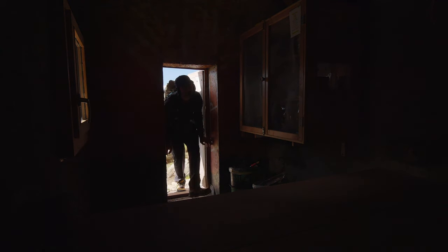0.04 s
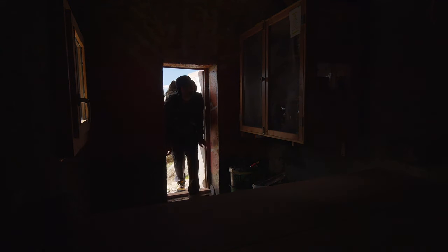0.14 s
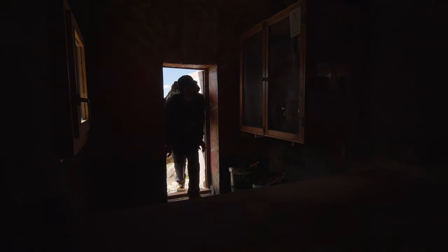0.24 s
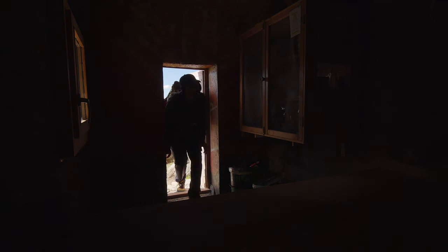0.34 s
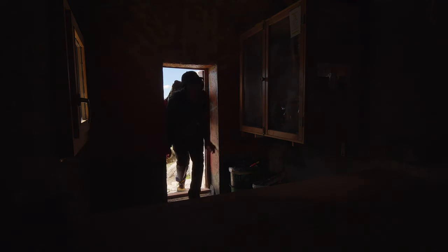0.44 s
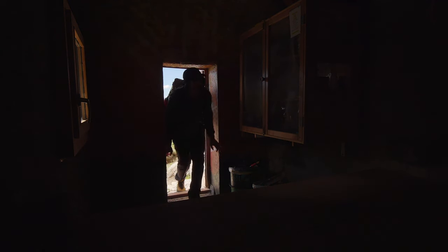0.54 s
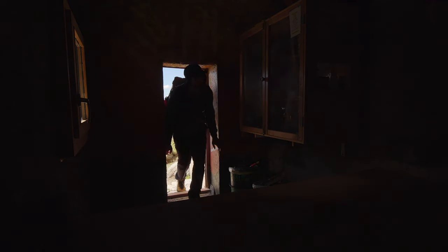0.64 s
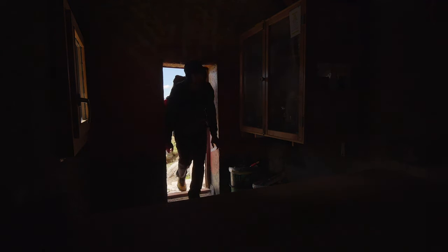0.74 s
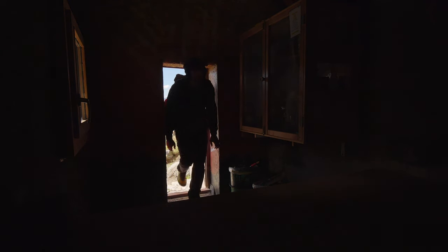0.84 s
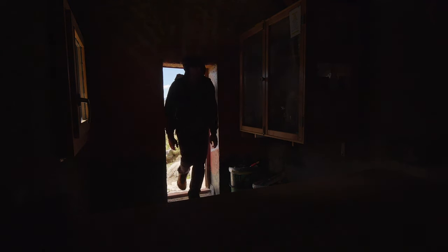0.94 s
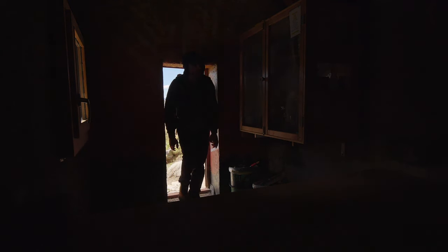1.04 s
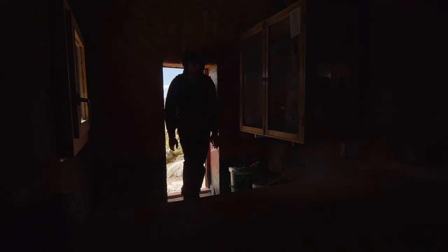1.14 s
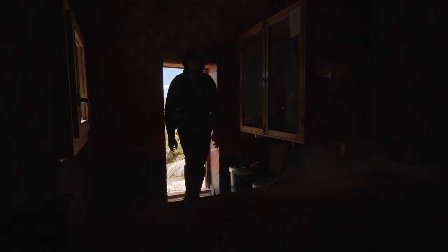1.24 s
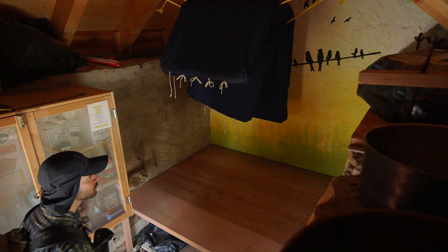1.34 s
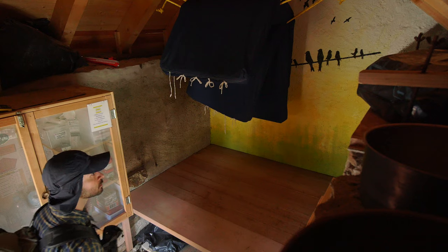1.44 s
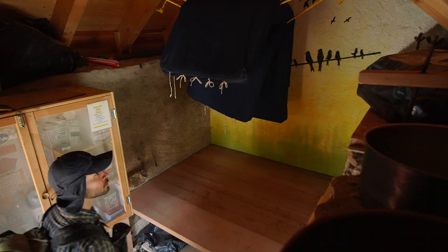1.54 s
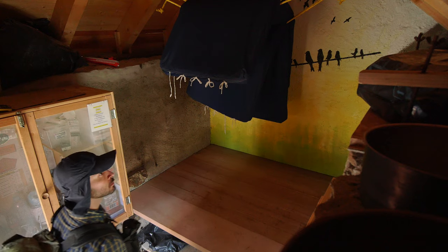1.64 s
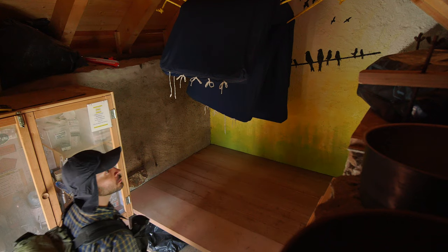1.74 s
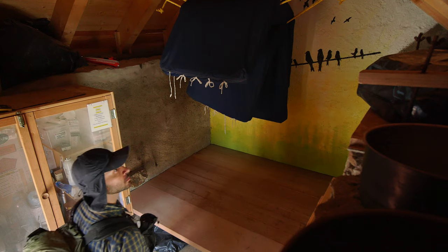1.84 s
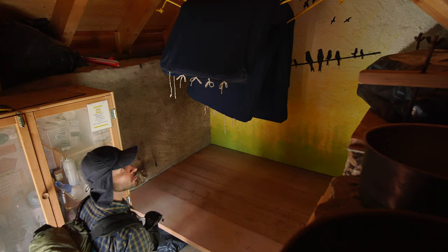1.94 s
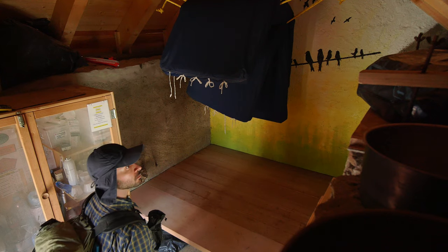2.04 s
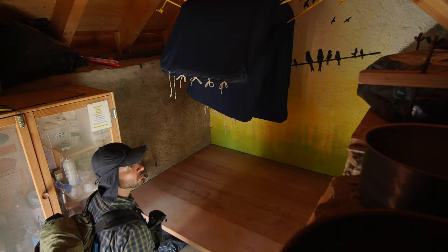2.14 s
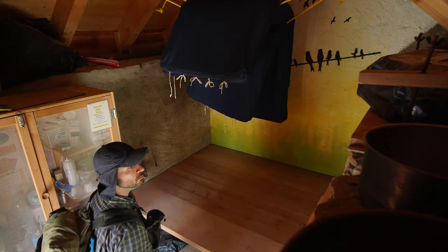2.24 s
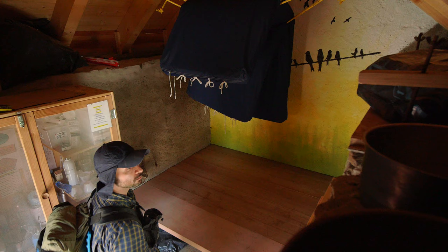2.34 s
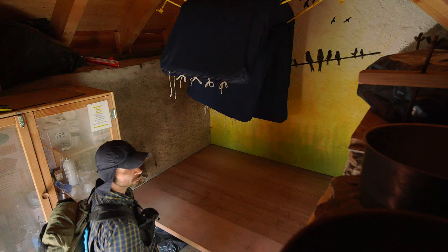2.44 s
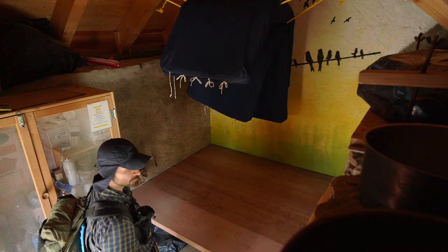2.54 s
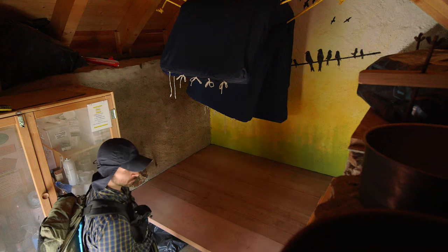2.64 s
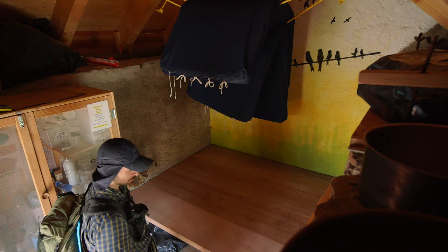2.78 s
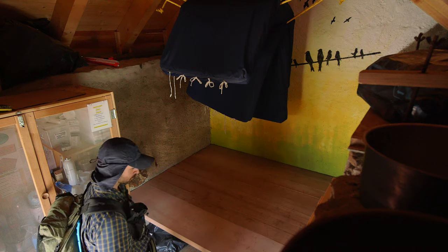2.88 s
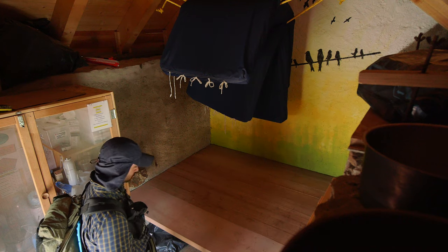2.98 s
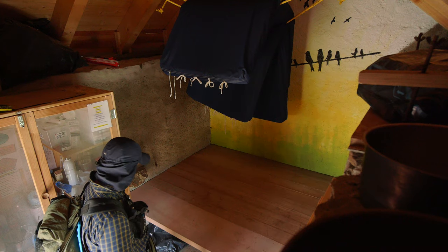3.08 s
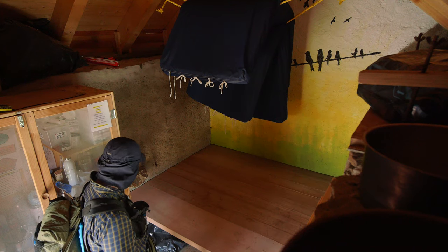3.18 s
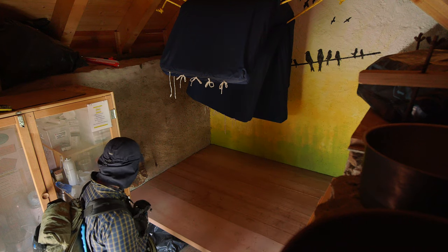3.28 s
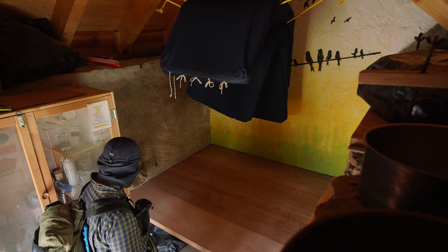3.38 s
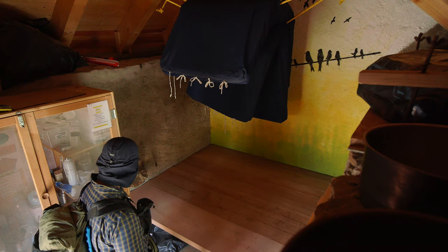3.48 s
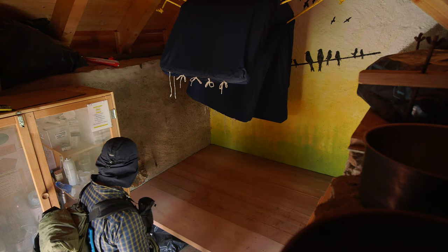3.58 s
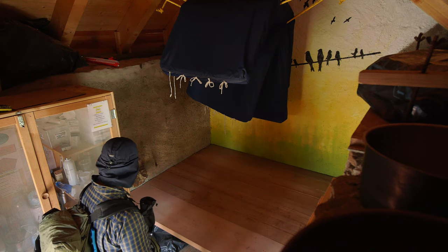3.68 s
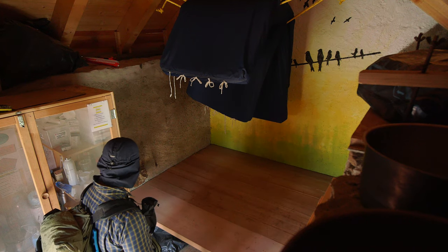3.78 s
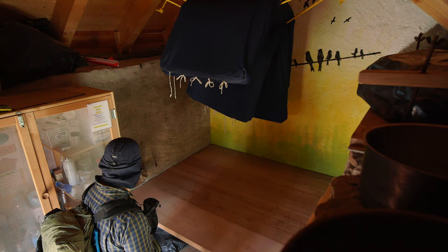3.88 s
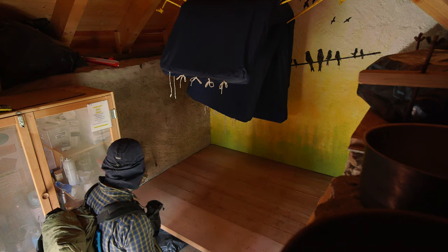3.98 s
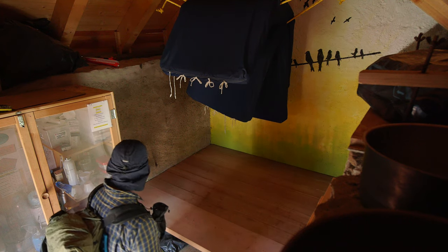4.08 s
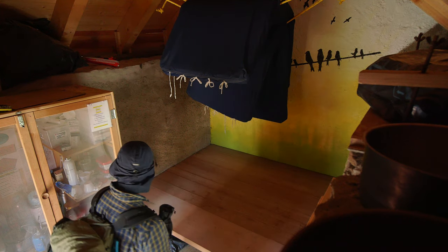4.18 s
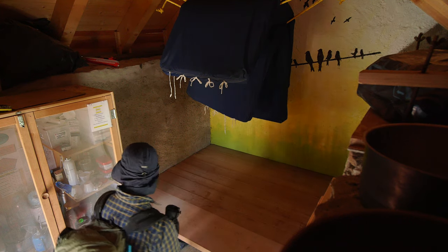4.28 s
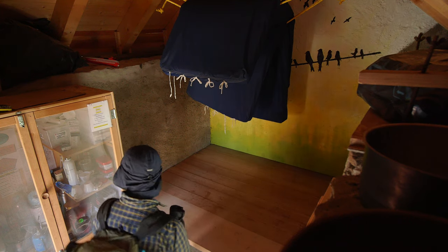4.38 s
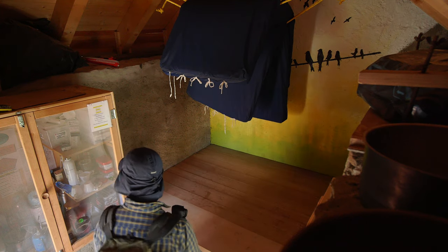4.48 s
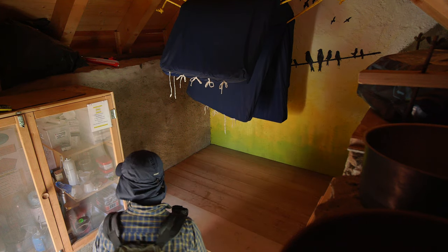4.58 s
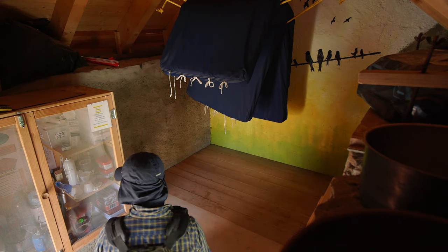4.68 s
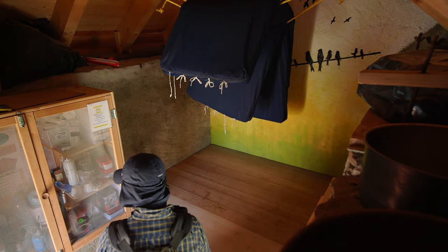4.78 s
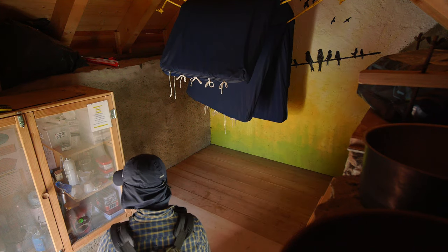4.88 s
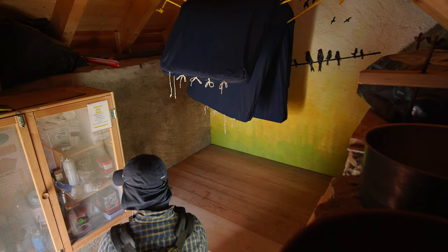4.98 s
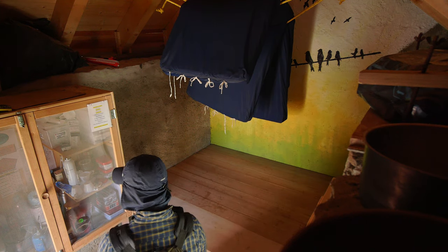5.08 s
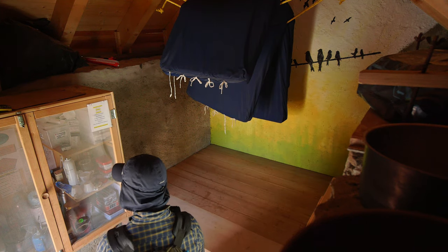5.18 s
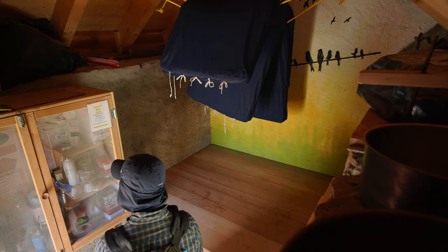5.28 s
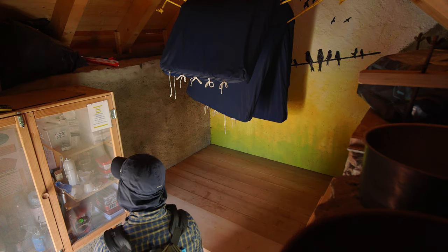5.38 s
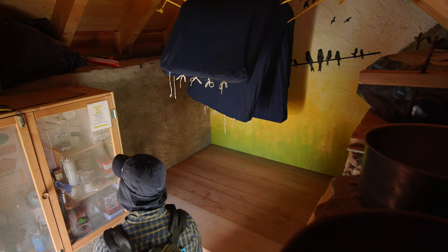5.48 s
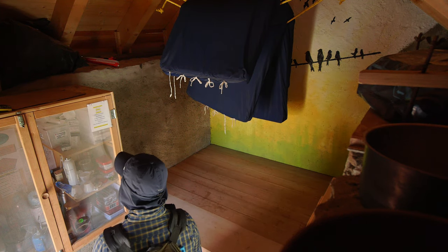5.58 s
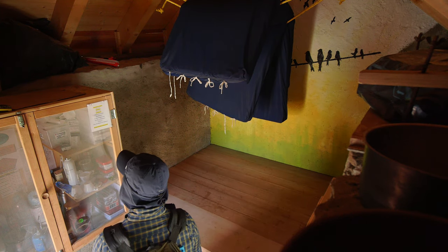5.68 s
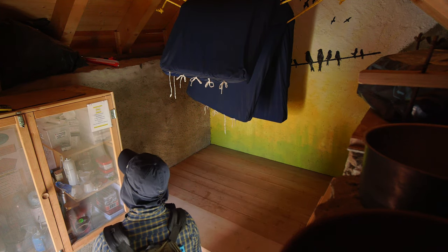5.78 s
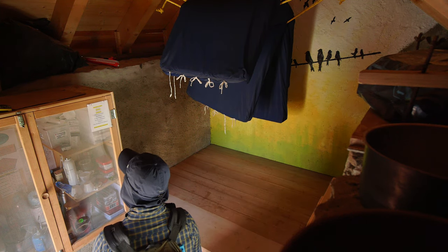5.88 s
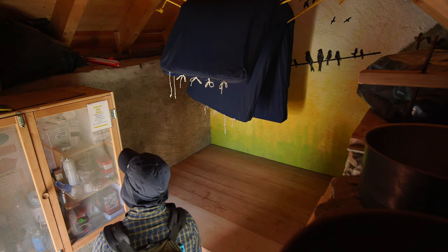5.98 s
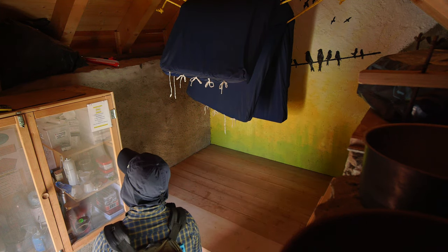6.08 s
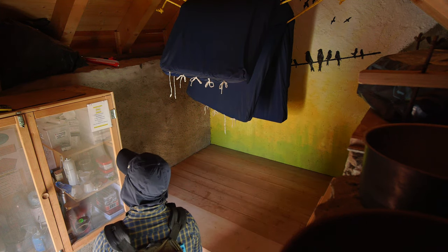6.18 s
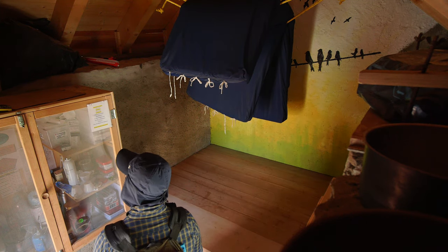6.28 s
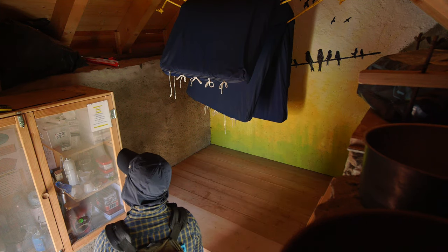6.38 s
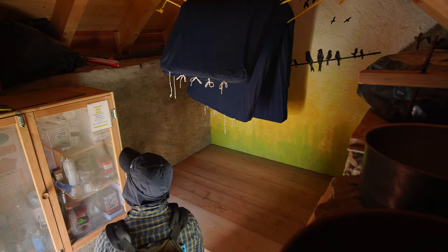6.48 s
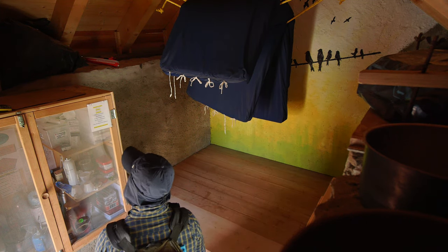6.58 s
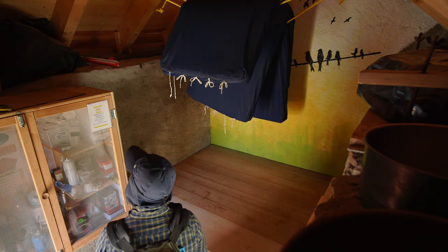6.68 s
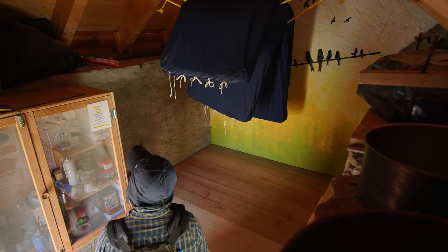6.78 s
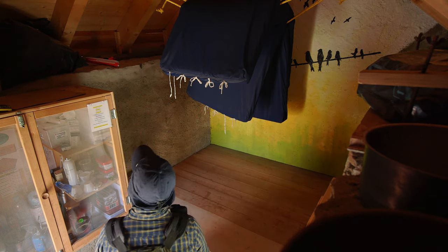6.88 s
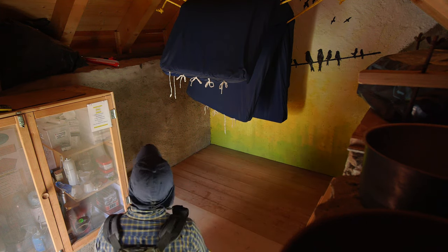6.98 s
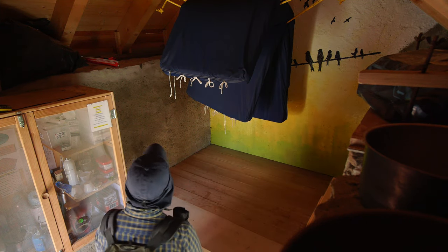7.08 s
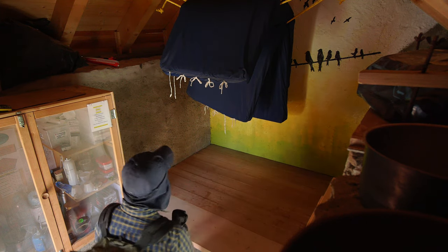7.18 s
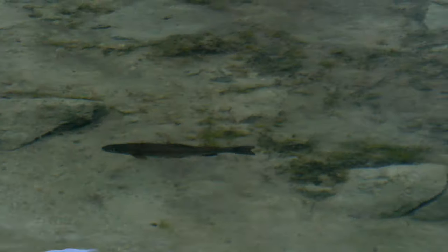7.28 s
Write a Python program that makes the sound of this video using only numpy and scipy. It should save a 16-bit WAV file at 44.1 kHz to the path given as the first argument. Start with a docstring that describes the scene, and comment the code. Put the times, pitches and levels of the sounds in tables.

```python
"""A hiker in boots, with a pack, walks and shifts about on the floorboards of a small wooden hut.
First come heavy steps, hollow rasps and loud rustling, then sparser movement and a second busy spell;
something slides lightly on wood, a few last knocks follow, and a heavy push of air rocks the microphone.
Knocks are decaying board modes; grit, cloth and dragging soles are trains of random slips, filtered.
The sound is nearly mono: only a faint hiss, partly swelling with the treble, sets left and right apart."""
import sys
import numpy as np
from scipy import signal
from scipy.fft import rfft, irfft, next_fast_len
from scipy.io import wavfile
from scipy.ndimage import uniform_filter1d

SR = 44100
rng = np.random.default_rng(int(sys.argv[2]) if len(sys.argv) > 2 else 0)


def voltage_ratio(decibels):
    """Convert decibels (scalar or array-like) to amplitude ratios, 20 dB per decade."""
    exponent = np.asarray(decibels, float) / 20
    return 10 ** exponent


def dump(signal):
    """Clip the signal to [-1, 1] and save it as 16-bit WAV at the path in sys.argv[1]."""
    limited = np.clip(np.atleast_2d(signal).T, -1, 1)
    pcm = np.round(limited * 32767).astype(np.int16)
    wavfile.write(sys.argv[1], SR, pcm)


N = 323253

# modes of the floorboards: pitch_hz, level_db
BOARD_MODES = [(62, -31), (85, -7.5), (97, -22), (110, -5), (128, -3), (148, -13), (206, 0), (226, 0),
               (250, 1.5), (300, 2.5), (346, 6), (415, 5.5), (468, 5), (550, 5.5), (620, 5.5), (680, 8),
               (780, 5.5), (830, 3.5), (890, 4.5), (955, 5), (1020, 3.5), (1140, 4.5), (1220, -7),
               (1300, 5.5), (1450, 5), (1580, 3.5), (1710, 1.5), (1860, 0), (2070, 1.5), (2230, -10),
               (2390, -2)]


def rms_one(x):
    """Normalisation: scales a signal to unit root mean square."""
    return x / np.sqrt(np.mean(x ** 2) + 1e-20)


def filtered(x, order, hz, kind):
    """Butterworth filter: a maximally flat pass band."""
    return signal.sosfilt(signal.butter(order, hz, kind, fs=SR, output="sos"), x)


def in_time(rows, silent_db=-120):
    """Linear interpolation: turns columns into curves against time, silent outside the rows."""
    s, *columns = np.transpose(rows)
    return [np.interp(np.arange(N) / SR, s, c, silent_db, silent_db) for c in columns]


def at_hz(points, hz):
    """Interpolation on a logarithmic frequency axis."""
    point_hz, values = np.transpose(points)
    return np.interp(np.log(np.maximum(hz, 1)), np.log(point_hz), values)


def coloured(x, spectrum):
    """Spectral shaping: multiplies the transform of a long noise by a dB curve."""
    size = next_fast_len(len(x))
    hz = np.arange(size // 2 + 1) * SR / size
    return irfft(rfft(x, size) * voltage_ratio(at_hz(spectrum, hz)), size)[:len(x)]


def drift(rate_hz):
    """Slow random modulation: noise through a double low-pass pole, scaled to spread 1."""
    hop = 40   # samples between computed points
    r = np.exp(-2 * np.pi * rate_hz * hop / SR)
    slow = signal.lfilter([1], [1, -2 * r, r * r], rng.standard_normal(N // hop + 2002))[2000:]
    return np.interp(np.arange(N) / hop, np.arange(len(slow)), rms_one(slow))


def grains(per_s, spread_db):
    """Stick-slip friction as random impulses of uneven size and sign."""
    size_db = spread_db * np.minimum(rng.exponential(1, N), 5)
    sizes = voltage_ratio(size_db) * rng.choice([-1, 1], N)
    return sizes * (rng.random(N) < per_s / SR) + 1e-18


def resonances(x, peaks):
    """Modal filtering: parallel two-pole resonances of alternating sign, with unit rms in sum."""
    out = 0
    for k, (hz, width_hz, db) in enumerate(peaks):
        r = np.exp(-np.pi * width_hz / SR)
        poles = [1, -2 * r * np.cos(2 * np.pi * hz / SR), r * r]
        out = out + (-1) ** k * voltage_ratio(db) * rms_one(signal.lfilter([1, 0, -1], poles, x))
    return rms_one(out)


def stroke(rows, rise_db_per_s, fall_db_per_s):
    """Exponential envelope: each stroke swells, holds and fades at constant rates in dB."""
    t, gain = np.arange(N) / SR, 0
    for s, db, hold in rows:
        rise = rise_db_per_s * np.maximum(s - t, 0)
        fall = fall_db_per_s * np.maximum(t - s - hold, 0)
        gain = gain + voltage_ratio(db - rise - fall)
    return gain


def stillness():
    """Stationary noise: the quiet hut and self noise, with a fixed spectrum."""
    # noise spectrum: pitch_hz, level_db (per Hz)
    still_spectrum = [(15, -37), (25, 2.5), (107, 9), (222, 5.5), (341, 7.5), (540, 3), (652, -12),
                      (707, 2.5), (1590, -3.5), (2130, -2), (8430, -8.5), (15700, -10.5)]
    return voltage_ratio(-54) * rms_one(coloured(rng.standard_normal(N), still_spectrum))


def side_hiss(mid):
    """Decorrelation: a flickering hiss, opposite in left and right, partly following treble loudness."""
    # hiss spectrum: pitch_hz, level_db (per Hz)
    hiss_spectrum = [(15, -31), (25, -5), (260, -2.5), (469, -2), (509, -1), (826, -4), (2060, -3.5),
                     (7300, -3.5), (15500, -4.5)]
    upper = filtered(mid, 2, 800, "high")
    loudness = np.sqrt(uniform_filter1d(upper ** 2, size=SR // 40) + 1e-12)
    steady = rms_one(coloured(rng.standard_normal(N), hiss_spectrum))
    swell = rms_one(coloured(rng.standard_normal(N), hiss_spectrum))
    swell = filtered(swell, 1, 6100, "low") * voltage_ratio(-16.5) * loudness
    side = (voltage_ratio(-61.5) * steady + swell) * voltage_ratio(2.4 * drift(41))
    return side * np.array([[1], [-1]])


def hut(x):
    """Reverberation between close wooden walls: convolution with noise that dies band by band."""
    # reverberation time: pitch_hz, t60_s
    wall_t60 = [(100, 0.32), (500, 0.13), (2000, 0.22), (8000, 0.1)]
    t, tail = np.arange(SR // 3) / SR, 0
    for low in 60 * 2. ** np.arange(8):
        t60 = at_hz(wall_t60, low * np.sqrt(2))
        noise = rng.standard_normal(len(t)) * voltage_ratio(-60 * t / t60)
        noise = noise * (t > .005)   # the reverberation starts after 5 ms
        tail = tail + filtered(noise, 2, [low, 2 * low], "band")
    tail = voltage_ratio(-6.5) * tail / np.sqrt(np.sum(tail ** 2))
    return signal.fftconvolve(x, tail)[:N]


def air_push():
    """Infrasonic pressure on the microphone: slow lumpy noise, levelled and then given its swell."""
    # strength of the push: start_s, level_db
    push_levels = [(7.0, -63), (7.122, -36), (7.162, -30.5), (7.276, -17), (7.33, -25)]
    lumps = filtered(rng.standard_normal(N), 2, [8, 26], "band")
    even = lumps / np.sqrt(uniform_filter1d(lumps ** 2, size=SR // 8))
    return voltage_ratio(in_time(push_levels)[0]) * even


def rubbing():
    """Friction-driven resonance: dense slips excite the few modes of a rasp and of a slide."""
    # a strap or sole rubbing with a hollow rasp: peak_s, level_db, hold_s
    rasp_strokes = [(0.355, -24, 0.0063), (0.862, -30, 0.057)]
    # resonances of the rasp: pitch_hz, width_hz, level_db
    rasp_modes = [(1637, 99, -1), (2050, 210, -2), (2410, 310, -1)]
    # something slides lightly on wood: peak_s, level_db, hold_s
    slide_strokes = [(5.62, -51.5, .5)]
    # resonances of the slide: pitch_hz, width_hz, level_db
    slide_modes = [(474, 8.2, -12), (924, 68, -7), (1145, 35, -6)]
    rasp = resonances(grains(1500, 0.97), rasp_modes)
    rasp = rasp * stroke(rasp_strokes, rise_db_per_s=231, fall_db_per_s=188)
    uneven_slips = grains(900, 1.3) * voltage_ratio(3.2 * drift(4.4))
    slide = resonances(uneven_slips, slide_modes)
    return rasp + slide * stroke(slide_strokes, rise_db_per_s=180, fall_db_per_s=89)


def movement():
    """Friction: cloth crackles finely; dragged soles and shifting weight shake the board modes."""
    # course of the movement: start_s, rustle_db (cloth), drag_db (soles on the boards)
    motion = [(0.0, -34.5, -56), (0.18, -34, -42), (0.28, -33.5, -38), (0.38, -32.5, -37),
              (0.51, -25.5, -21), (0.59, -41, -37.5), (0.70, -30.5, -33.5), (0.79, -37, -37),
              (0.9, -28, -45), (1.04, -38, -42.5), (1.16, -24, -68), (1.22, -34, -43), (1.3, -38.5, -44),
              (1.38, -35.5, -43), (1.48, -30.5, -29.5), (1.59, -35, -38.5), (1.71, -29.5, -27.5),
              (1.92, -30, -46), (1.99, -41.5, -44), (2.18, -41.5, -47), (2.35, -36, -41.5),
              (2.45, -36.5, -35), (2.57, -43.5, -47.5), (3.08, -49, -54), (3.18, -46.5, -59),
              (3.37, -51, -60), (3.59, -43, -58), (3.84, -49.5, -59), (3.94, -39.5, -42), (4.06, -38, -36),
              (4.35, -39, -44), (4.47, -33.5, -36), (4.61, -37, -41.5), (4.69, -42.5, -46.5),
              (4.88, -39.5, -49.5), (5.04, -47.5, -47), (5.19, -46, -47), (5.27, -43.5, -46),
              (5.45, -47, -56), (5.59, -55, -51), (5.96, -60.5, -56), (6.2, -53.5, -54.5),
              (6.72, -54.5, -60), (6.92, -39.5, -43.5), (7.06, -46.5, -56), (7.17, -39, -41.5),
              (7.27, -39.5, -39.5), (7.33, -36, -42)]
    # spectrum of clothes and pack: pitch_hz, level_db (per Hz)
    cloth_spectrum = [(180, -13), (300, -7), (501, -10.5), (572, -8.5), (686, -9), (1270, -9.5),
                      (3200, -10), (8220, -17), (14200, -30.5), (15700, -19)]
    rustle_db, drag_db = in_time(motion)
    rustle = rms_one(coloured(grains(12000, 3.1), cloth_spectrum))
    rustle = rustle * voltage_ratio(rustle_db + 1.43 * drift(6.3))
    sheen = filtered(rustle, 2, 6000, "high")
    rustle = rustle + (voltage_ratio(2.5) - 1) * sheen   # treble lift

    upper_modes = [(hz, 12 + .06 * hz, db) for hz, db in BOARD_MODES if hz > 200]
    drag = resonances(grains(900, 2.0) * voltage_ratio(0.9 * drift(14)), upper_modes) * voltage_ratio(drag_db)

    # weight on the joists follows the dragging soles, later and with less swing
    lag_s, swing_share = .04, 0.71
    lower_modes = [(hz, 25.0, db) for hz, db in BOARD_MODES if hz <= 200]
    keep = np.exp(-1 / (lag_s * SR))
    load = signal.lfilter([1 - keep], [1, -keep], voltage_ratio(drag_db))
    weight = resonances(grains(600, 4.0), lower_modes) * voltage_ratio(-28) * load ** swing_share
    return rustle + drag + weight


def scuffs():
    """Granular friction: a landing sole crushes grit in a burst of slips, broad with a hump of hiss."""
    # grit under the soles: start_s, level_db, centre_hz, rise_s (time constant), t60_s
    grit_bursts = [(.197, -30.5, 1620, 0.0017, 0.19), (0.712, -21.5, 4500, 0.0039, 0.14),
                   (0.431, -26.5, 1000, 0.012, 0.3), (.475, -18.5, 1850, 0.024, 0.21),
                   (1.092, -28.5, 4040, 0.0022, 0.088), (1.149, -26.5, 2400, 0.0079, 0.091),
                   (1.487, -40, 2450, 0.002, 0.062), (1.615, -48, 2950, 0.0023, 0.088),
                   (2.207, -38, 1500, 0.0035, 0.26), (3.954, -31, 2250, 0.0018, 0.23),
                   (5.198, -25, 2840, 0.0096, 0.12), (7.286, -33.5, 1520, 0.0013, 0.069)]
    out, t = np.zeros(N + SR), np.arange(SR // 3) / SR
    grit = grains(9000, 2.4)
    for s, db, centre_hz, rise, t60 in grit_bursts:
        i = round(s * SR)
        first = min(i, N - len(t))   # where the slips are taken from
        broad = filtered(grit[first:first + len(t)], 2, [900, 8000], "band")
        hump = resonances(broad, [(centre_hz, 0.34 * centre_hz, 0)])
        burst = rms_one(broad) + 0.95 * hump
        out[i:i + len(t)] += voltage_ratio(db - 60 * t / t60) * (1 - np.exp(-t / rise)) * burst
    return out[:N]


def knocks():
    """Modal impact: a blow starts the board modes near its centre in step; high modes die first."""
    # blows on the boards: start_s, peak_db, centre_hz, t60_s (of the ring; floor of 0.03),
    # fall_db (per octave above the centre)
    blows = [(0.197, -20, 290, 0.29, 5.5), (0.35, -28, 240, 0.43, 26), (.427, -7, 209, 0.2, 4.5),
             (.440, -4, 212, 0.36, 3.5), (.463, -12.5, 213.4, 0.43, 17), (0.489, -24, 328, 0.32, 1),
             (0.637, -21.5, 233, 0.25, 17), (0.713, -13.5, 226, 0.49, 0), (0.769, -28, 230, 0.22, 15),
             (0.799, -38, 228, 0.17, 20), (1.105, -27.5, 320, 0.15, 2), (1.160, -22.5, 365, 0.11, 3),
             (1.385, -18, 87, 0.31, 0.5), (1.448, -14, 288, 0.12, 15), (1.488, -16, 1220, 0.022, -20),
             (1.615, -14, 178, 0.13, 2.5), (1.693, -22.5, 410, 0.085, 9), (1.728, -21, 338, 0.27, -0.5),
             (1.768, -18, 614, 0.051, 27), (2.207, -14, 372, 0.14, 3.5), (2.212, -32, 880, 0.043, 7),
             (2.218, -21.5, 103, 0.4, 18), (2.288, -21, 300, 0.11, -2), (2.473, -24, 350, 0.19, -4),
             (2.504, -18.5, 1316, 0.021, 6), (2.511, -33, 1430, 0.02, 6), (2.556, -24, 240, 0.042, 26),
             (3.168, -32, 1240, 0.048, -4), (3.304, -33, 730, 0.057, 6), (3.634, -38.5, 315, 0.27, 3),
             (3.923, -30, 652, 0.16, 11), (3.956, -23, 1220, 0.13, 15), (4.022, -25.5, 392, 0.09, 1.5),
             (4.078, -26, 1000, 0.043, 22), (4.119, -16.5, 387, 0.11, 20), (4.1, -32, 112, 0.23, 14),
             (4.15, -26, 300, 0.11, 1), (4.187, -10.5, 330, 0.025, 3.5), (4.287, -27.5, 496, 0.28, 2.5),
             (4.321, -27.5, 385, .1, 1), (4.416, -20.5, 763, 0.045, -6), (4.481, -23.5, 1530, 0.038, -14),
             (4.508, -19, 1250, 0.024, -1), (4.517, -38, 110, 0.1, 9), (4.593, -23.5, 127, 0.16, 0),
             (5.214, -15.5, 900, 0.098, -4.5), (5.244, -31, 85, 0.15, 7), (5.300, -29.5, 940, 0.04, -2),
             (5.489, -26.5, 350, .1, 10), (5.513, -36, 416, 0.1, 30), (6.380, -18.5, 284, 0.14, 4),
             (6.385, -10.5, 640, 0.12, 10), (6.437, -25, 255, 0.1, 8), (6.443, -16.5, 568, 0.12, 3.5),
             (6.929, -36, 304, 0.2, 0), (7.158, -30, 370, 0.1, 5), (7.207, -23, 1080, 0.041, 1),
             (7.226, -29, 300, .1, 17), (7.29, -9.5, 315, 0.17, 11), (7.309, -25, 1300, .1, 8)]
    # fall one octave below the centre of a knock: centre_hz, fall_db
    fall_below = [(110, 20), (210, 11.5), (340, 17.5), (700, 13), (1300, 6)]
    out, t = np.zeros(N + SR), np.arange(SR // 3) / SR
    hz, mode_db = np.transpose(BOARD_MODES)[:, :, None]
    chance = rng.standard_normal((len(blows), 2, len(BOARD_MODES), 1))
    for (s, peak_db, centre_hz, t60, above_db), (strength, place) in zip(blows, chance):
        octaves = np.log2(hz / centre_hz)
        below_db = at_hz(fall_below, centre_hz)
        slope_db = np.where(octaves > 0, -above_db * octaves, -below_db * octaves ** 2)
        slope_db += 10.7 * np.exp(-(octaves / 0.076) ** 2)   # the board right underfoot rings most
        pitch = hz * (1 + 0.023 * place)   # another spot on the floor, slightly other boards
        life = np.clip(t60, .03, 1) * (hz / centre_hz) ** np.where(octaves > 0, -.6, -.3)
        level_db = mode_db + slope_db + 2.0 * strength - 60 * t / life
        ring = (voltage_ratio(level_db) * np.sin(2 * np.pi * pitch * t)).sum(axis=0)
        ring *= 1 - np.exp(-t / 0.00077)   # contact time
        ring *= 1 + 1.8 * np.exp(-t / 0.0097)   # sharp first pulse, then the sole damps the board
        low_hz = max(centre_hz / 2 ** np.sqrt(21.0 / below_db), 45)
        ring = filtered(ring, 4, low_hz, "high")   # a knock of higher pitch has less deep sound
        i = round(s * SR)
        out[i:i + len(t)] += voltage_ratio(peak_db) * ring / np.abs(ring).max()
    return out[:N]


def scene():
    """Superposition: all sources add in the middle; only the side hiss sets left and right apart."""
    impacts = knocks() + scuffs()
    mid = impacts + hut(impacts) + movement() + rubbing() + stillness()
    return mid + air_push() + side_hiss(mid)


def band_limit(x):
    """A steep low-pass at the top of the band."""
    return signal.sosfilt(signal.butter(12, 15820, fs=SR, output="sos"), x)


def record(dry):
    """Band limiting: a steep low-pass removes 60 dB from 16 kHz up."""
    low_pass = signal.cheby2(12, 60, 16000, fs=SR, output="sos")
    mix = signal.sosfilt(low_pass, dry)
    return band_limit(mix)


dry = scene()
out = record(dry)
dump(out)
```